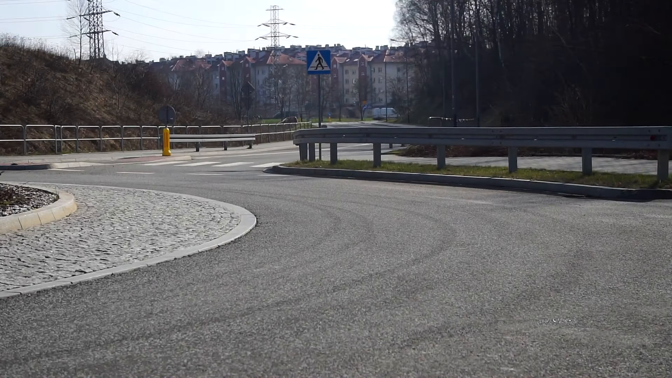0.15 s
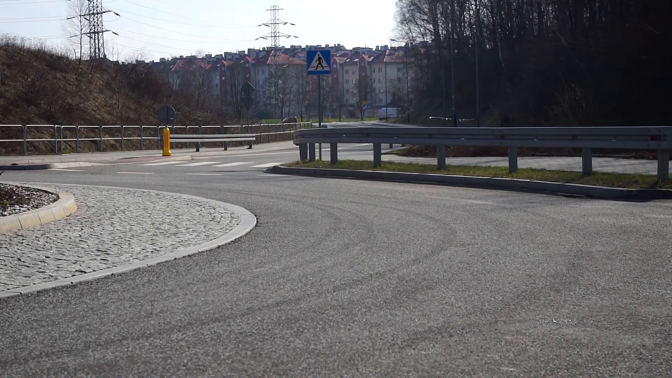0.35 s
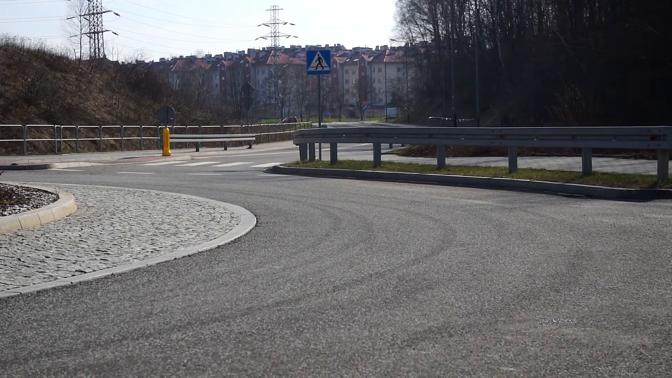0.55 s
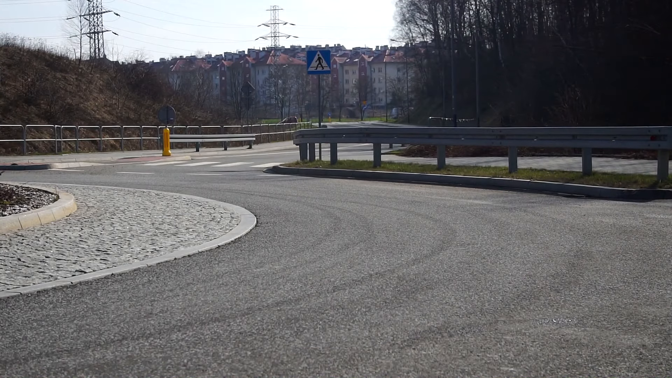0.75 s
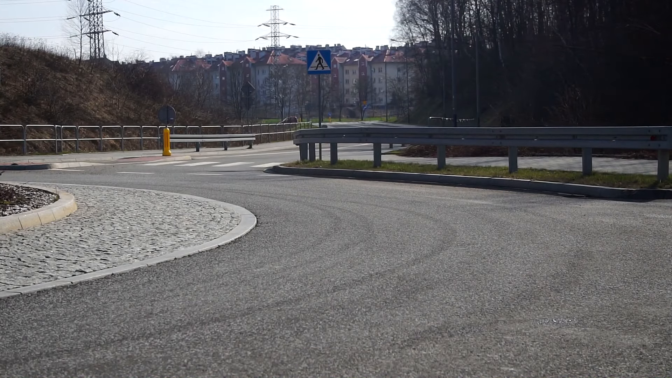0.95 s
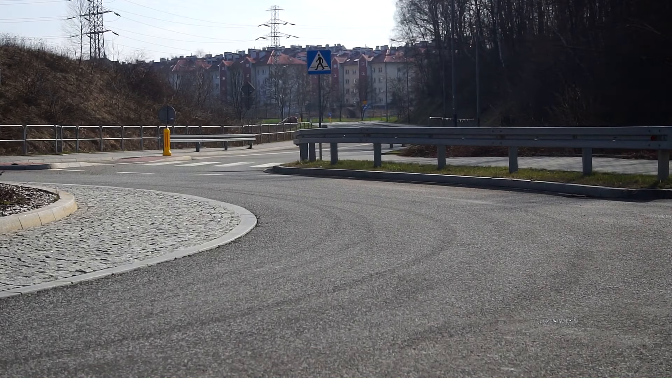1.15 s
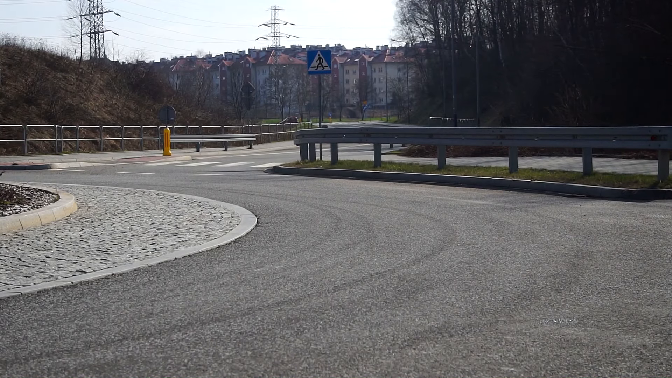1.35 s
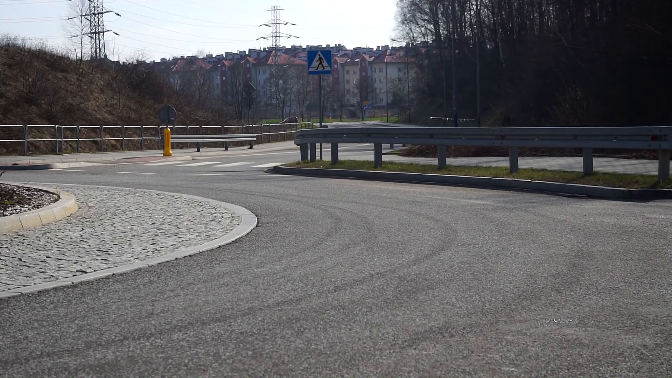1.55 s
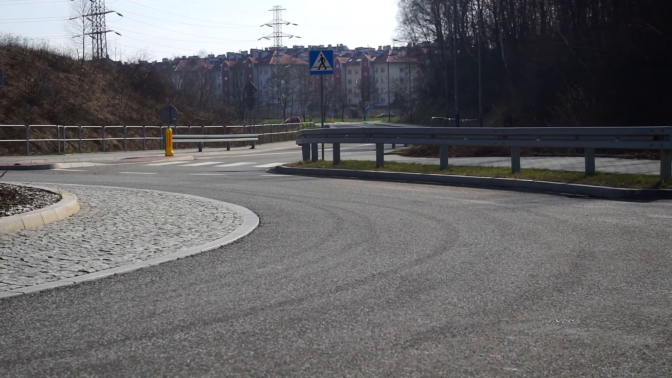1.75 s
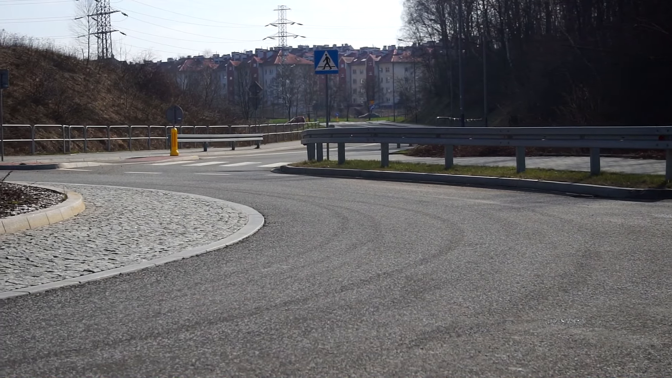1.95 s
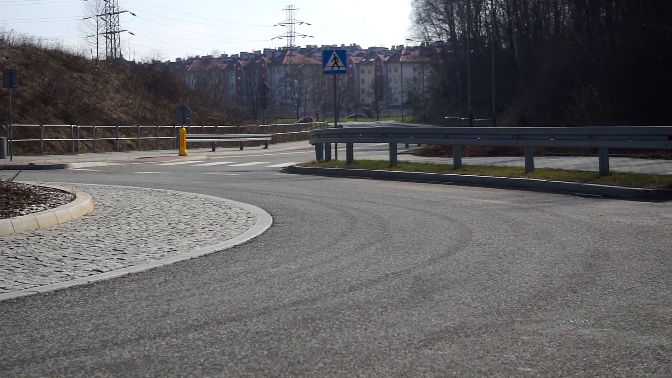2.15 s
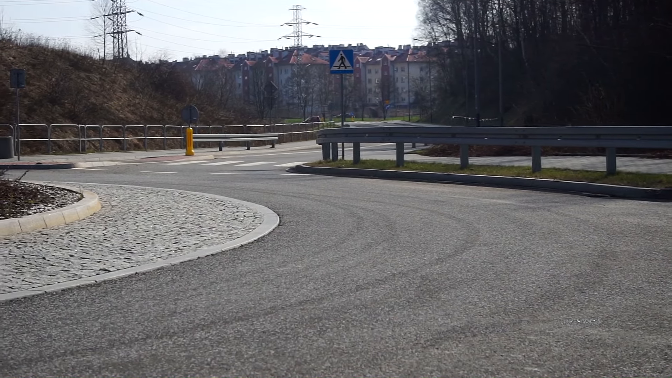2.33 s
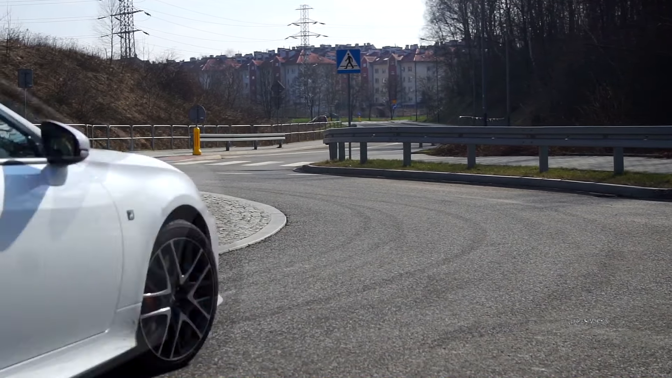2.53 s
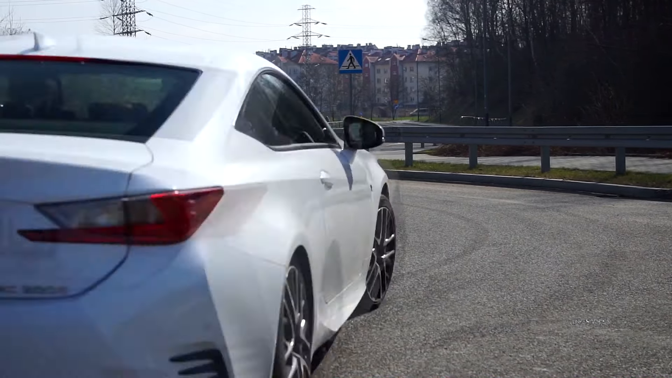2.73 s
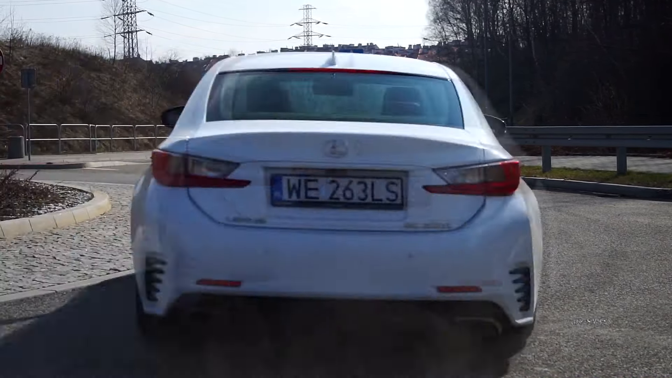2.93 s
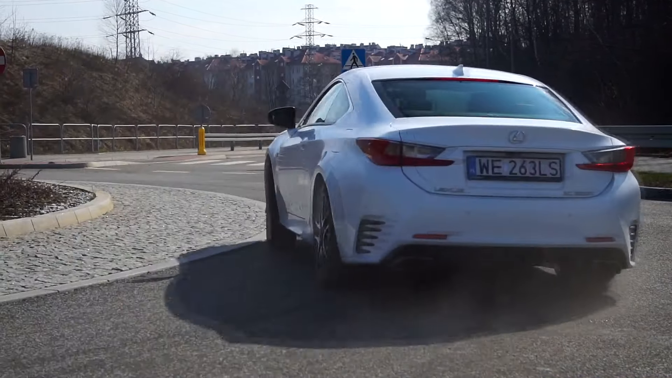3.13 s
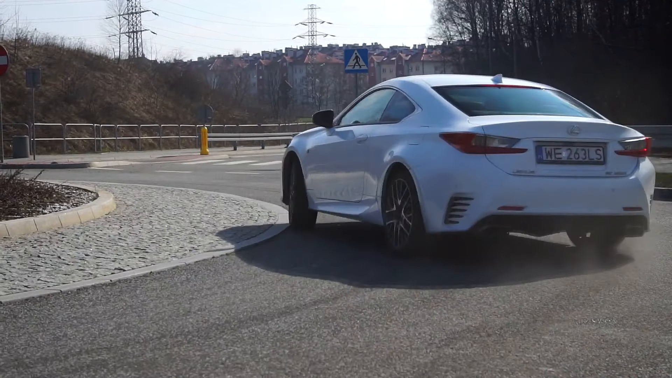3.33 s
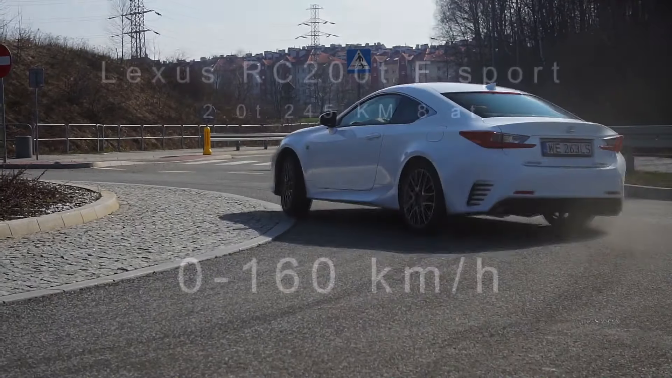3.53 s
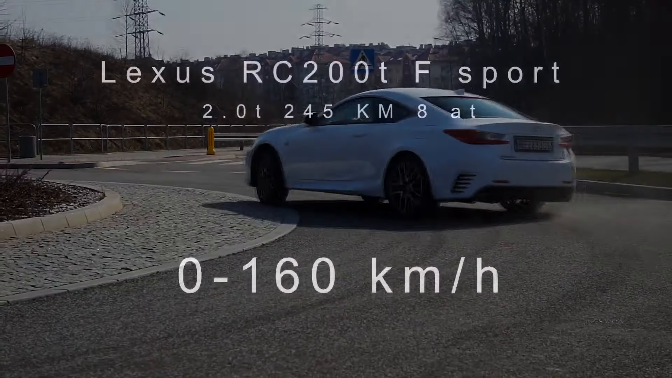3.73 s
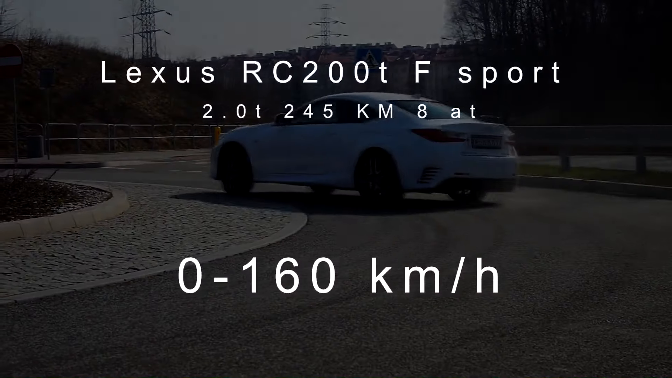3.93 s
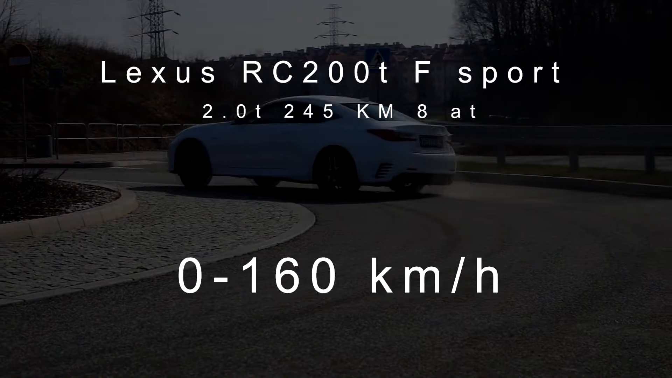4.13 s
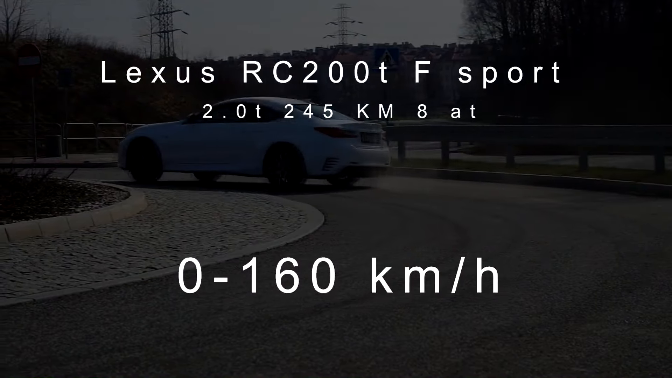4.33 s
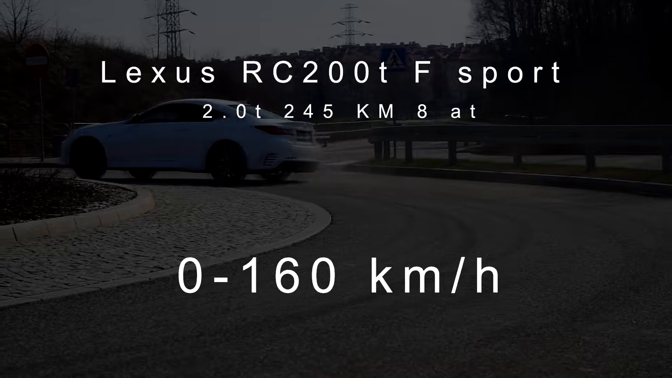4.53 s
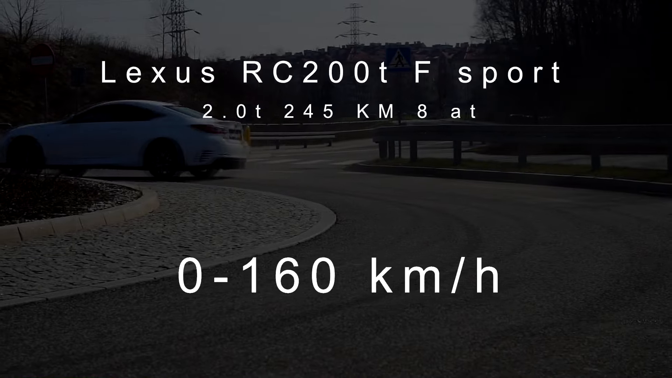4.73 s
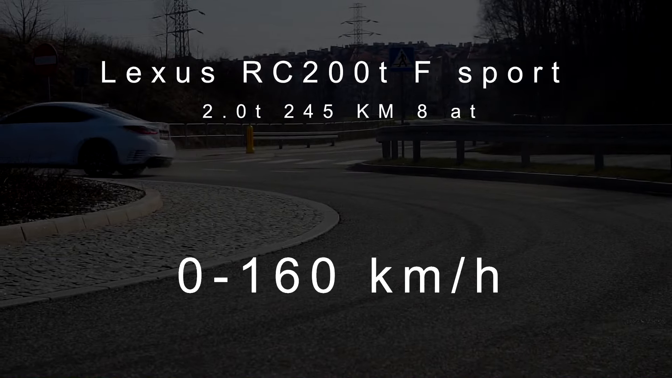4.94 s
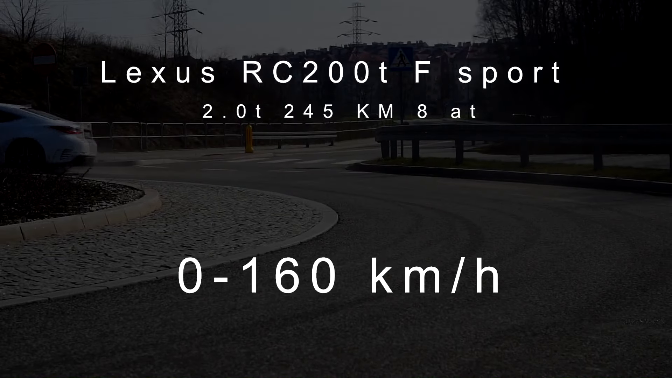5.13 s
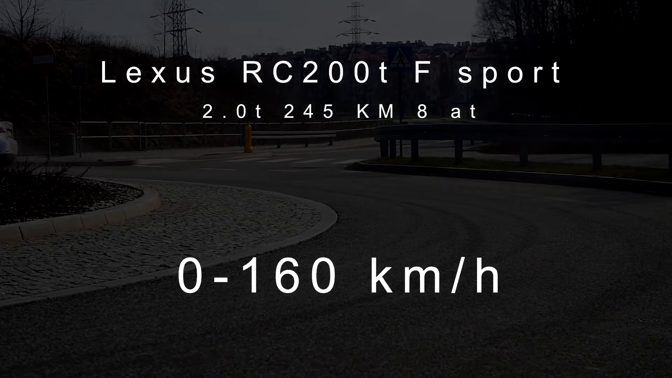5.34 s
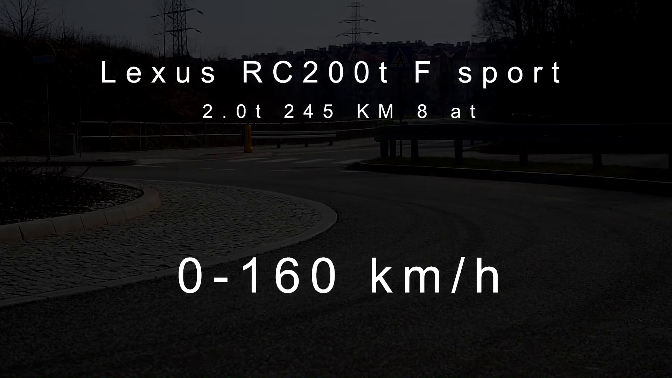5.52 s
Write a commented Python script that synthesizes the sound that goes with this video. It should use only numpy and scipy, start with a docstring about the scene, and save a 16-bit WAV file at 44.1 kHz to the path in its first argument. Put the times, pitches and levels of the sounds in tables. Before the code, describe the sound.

Continuous tyre squeal, two close rough notes beating together with brighter overtones, over gritty hiss and low rolling roar. It is loudest early during wheelspin, with brief yelps and engine growl on the left. A hissing swish marks the close pass, then the sound shifts to the centre, receding with reflections from a guard rail and bank. Wind thumps the microphone near the end.

```python
"""A car slides round a roundabout: its wheels spin and cry, then grip, beside the microphones on the left.
Two tyres stick and slip on the asphalt, each singing a fluttering note over the scrub of rubber and grit.
The engine drones and the tyres roar beneath; a guard rail and a bank throw the squeal back.
Midway the wheels pass closest with a swish and a spray of grit, and the car draws away ahead.
Late on a gust swells and buffets the microphones while the squeal dies away."""
import sys
import numpy as np
from scipy import signal
from scipy.fft import rfft, irfft
from scipy.io import wavfile

SR = 44100
rng = np.random.default_rng(int(sys.argv[2]) if len(sys.argv) > 2 else 0)


def generate_wav(sig):
    """Save sig (samples, or channels by samples) to the path in sys.argv[1] as 16-bit PCM at SR."""
    pcm = np.round(np.clip(np.atleast_2d(sig).T, -1, 1) * 32767).astype(np.int16)
    wavfile.write(sys.argv[1], SR, pcm)


N = 250297
TIME = np.arange(N) / SR  # s
FREQS = np.fft.rfftfreq(N, 1 / SR)  # Hz

# the car's bearing: start_s, beside (1 = beside the microphones on the left, 0 = straight ahead)
BEARING = [(0, 0.87), (2.3, 0.9), (2.55, 0.6), (2.75, 0.17), (3.1, 0.007)]
# how the slide goes: start_s, unsteadiness_factor of the stick-slip,
# echo_db (uneven, weakest near the pass and strongest at the end)
SLIDE_COURSE = [(0, 1.7, -6), (.5, 1.28, -9), (.9, 0.99, -4.5), (1.7, 1.5, -12.5), (2.1, 1.4, -8.5),
                (2.4, 0.94, -16), (2.9, 1.14, -6.5), (3.2, 0.96, -12), (3.4, 1.12, -4), (3.85, 0.73, -7.5),
                (4.2, 1.12, -6.5), (4.6, 1.24, -5.5), (5.2, 1.46, -3.5), (5.68, 1.26, 1)]
# rubber dragged over the asphalt: start_s, scrub_db, hiss_db
DRAG_LEVELS = [(0, -43, -53.5), (.2, -39.5, -52), (0.37, -36.5, -43), (0.52, -35.5, -45), (.63, -37.5, -49),
               (.74, -39, -46), (.82, -44.5, -50), (1.04, -41, -49), (1.11, -42.5, -43),
               (1.2, -39.5, -48.5), (1.28, -43.5, -51.5), (2.1, -44.5, -49.5), (2.65, -50.5, -53),
               (2.87, -48, -52), (3.0, -50.5, -57), (3.35, -40.5, -50.5), (3.7, -46.5, -53.5),
               (4.0, -48.5, -53), (4.2, -49.5, -64.5), (4.45, -53, -65), (4.6, -56, -76), (4.95, -58, -75),
               (5.2, -58.5, -87), (5.6, -76.5, -100)]


def amp(db):
    """Decibels to gain."""
    return 10 ** (np.asarray(db) / 20)


def unit(x):
    """Scales to rms 1."""
    return x / np.sqrt(np.mean(abs(x) ** 2) + 1e-20)


def curves(rows):
    """Each column of a table, joined by straight lines in time."""
    s, *columns = np.transpose(rows)
    return [np.interp(TIME, s, c) for c in columns]


def noise(spectrum):
    """Noise of rms 1 with the given spectrum, falling 20 dB per octave relative to each end beyond it."""
    hz, db = np.transpose(spectrum)
    octave, knots = np.log2(FREQS + 1), np.log2(hz)
    beyond = abs(octave - np.clip(octave, knots[0], knots[-1]))
    gain = amp(np.interp(octave, knots, db) - 20 * beyond)
    return unit(irfft(rfft(rng.standard_normal(N)) * gain, N))


def wander(rate_hz):
    """Smooth chance of rms 1, moving up to about the given rate."""
    u = FREQS / rate_hz
    gain = u / (u + .3) / np.sqrt(1 + u ** 10)
    return unit(irfft(rfft(rng.standard_normal(N)) * gain, N))


def pan(x, side_db):
    """Shares the power between left and right; side_db is left minus right."""
    gains = amp(np.array([side_db, -side_db]) / 2)
    return x * gains / np.sqrt(np.mean(gains ** 2, axis=0))


def wide(spectrum, alike):
    """A pair of noises, alike from 0 (unrelated) to 1 (the same)."""
    left, alike = noise(spectrum), np.clip(alike, -1, 1)
    right = alike * left + np.sqrt(1 - alike ** 2) * noise(spectrum)
    return np.array([left, right])


def place(pair):
    """The car's bearing sets the level and phase between the two microphones, frequency by frequency."""
    # the two microphones: pitch_hz, then with the car beside: left_minus_right_db, left_lag_radians,
    # then with the car ahead: left_minus_right_db, left_lag_radians
    microphones = [(200, 2, 1.2, 4, .1), (500, 14, 1.2, 0.5, .35), (780, 13.7, 0.76, 2.5, 0.69),
                   (1400, 24.5, 3, 0.5, 1.1), (1730, 14.4, 3.2, 0, 0.59), (2240, 7.9, 3, -0.5, 0.7),
                   (2670, 4.4, 2.5, 0.5, .5), (3200, 14.7, 3.5, 0, 0.57), (4200, 11.2, 4, 1, 0.69),
                   (5230, 1.7, 3, 4.5, .8), (6660, 4.6, 2.5, 2.5, 0.75), (8000, 8.1, 1.8, 4, 1.2),
                   (9300, 6, 1.75, 1.5, 0.82), (12000, 16, -0.5, 4, .8), (15000, 23, -10, 2, 2)]
    hz, s, z = signal.stft(pair, SR, nperseg=512, noverlap=384)
    beside = np.interp(s, *np.transpose(BEARING))
    knots, *columns = np.transpose(microphones)
    db_beside, lag_beside, db_ahead, lag_ahead = [np.interp(hz, knots, c)[:, None] for c in columns]
    lag = lag_ahead + beside * (lag_beside - lag_ahead)
    side_db = db_ahead + beside * (db_beside - db_ahead)
    z = pan(np.array([z[0] * np.exp(-1j * lag), z[1]]), side_db)
    return signal.istft(z, SR, nperseg=512, noverlap=384)[1][:, :N]


def wind():
    """A lumpy gust swells, peaks and dies at the microphones; eddies in it strike as sharper buffets."""
    # colour of the gust: pitch_hz, density_db (per Hz, relative)
    wind_spectrum = [(15, -16), (40, -2), (90, 0), (170, -3), (250, -8), (400, -21), (800, -33),
                     (1500, -53)]
    # eddies striking the microphones: start_s, peak_db
    buffets = [(4.459, -54), (4.56, -55), (4.87, -50), (4.931, -51), (5.07, -43), (5.12, -51),
               (5.185, -45.5), (5.269, -49)]
    start_s, peak_s, peak_db = 4.38, 5.06, -53.5
    rise_db_per_s, fall_db_per_s, buffet_rise_s = 10, 16, 0.013
    arrival = np.clip((TIME - start_s) / 0.09, 0, 1)
    late = TIME - peak_s
    gust_db = peak_db + np.minimum(rise_db_per_s * late, -fall_db_per_s * late)
    power = (arrival * amp(gust_db)) ** 2
    for buffet_s, db in buffets:
        age = np.maximum(TIME - buffet_s, 0) / buffet_rise_s
        power = power + (amp(db) * age * np.exp(1 - age)) ** 2
    lumps = unit(amp(1.5 * wander(30)))
    return np.sqrt(power) * lumps * wide(wind_spectrum, alike=0.95)


def road():
    """The low roar of rolling tyres, with their air cavity ringing near 210 Hz."""
    # colour of the rolling noise: pitch_hz, density_db (per Hz, relative)
    road_spectrum = [(25, -36), (55, -3.5), (90, 0.5), (130, -3.5), (175, -1), (212, 6.5), (260, -5),
                     (370, -1.5), (480, -2), (620, 2.5), (900, -22)]
    # rolling noise before a lift of 1 dB: start_s, level_db
    road_level = [(0, -49), (.35, -45), (.6, -50.5), (1.1, -60.5), (1.7, -62), (2.2, -62), (2.9, -57.5),
                  (3.5, -61.5), (4.1, -60.5), (4.6, -68.5), (5.2, -71.5), (5.68, -91)]
    level_db, = curves(road_level)
    beside, = curves(BEARING)
    return pan(amp(level_db + 1.0) * wide(road_spectrum, alike=0.9), 5.4 * beside)


def engine():
    """Shaft-locked orders of a four-cylinder engine; exhaust and intake add tones and noise with load."""
    # crankshaft speed: start_s, turns_per_s
    shaft = [(0, 44.8), (.2, 46), (.52, 51.8), (.75, 48), (.9, 48.3), (1.2, 50.7), (1.42, 51.7),
             (1.8, 43.5), (2.05, 40), (3.4, 44.7), (3.65, 46), (3.9, 48.5), (4.4, 46), (5.2, 40.3),
             (5.68, 40.4)]
    # engine levels: start_s, drone_db, boom_db (exhaust), light (share of the light-load timbre, 0-1)
    engine_course = [(0, -46, -50, 0.22), (.4, -46.5, -47, 0.01), (.55, -55, -60, 0.1),
                     (.8, -55, -62, 0.24), (1.1, -61, -71, 0.07), (1.45, -56.5, -76, 0.41),
                     (1.8, -67, -78, 0.22), (2.15, -66, -83, 0.3), (2.4, -81, -81, 0.6),
                     (3.2, -96, -96, 0.89), (4.2, -99, -91, 1), (5, -63.5, -84, 0.8),
                     (5.35, -63, -83, 0.99), (5.68, -66, -66, 0.98)]
    # engine orders: order (multiple of the shaft), load_db, light_db (at light load)
    orders = [(3, -14, -33), (4, 0.5, 2.5), (4.5, -15, -29.5), (5, -10.5, -21), (6, -14.5, -8.5),
              (7, -12.5, -25), (8, -16.5, -7), (9, -24.5, -23), (10, -7.5, -9.5), (11, -27, -28),
              (12, 3, -25), (13, -11, -31), (14, 3, -30), (16, -10, -16)]
    # colours of exhaust and intake noise: pitch_hz, density_db (per Hz, relative)
    rumble_spectrum = [(20, -17), (45, -1), (100, -24), (160, -8), (260, -23), (500, -17)]
    intake_spectrum = [(300, -13), (450, -10), (580, 8.5), (700, -7), (1000, -12.5)]
    speed, = curves(shaft)
    drone_db, boom_db, light = curves(engine_course)
    beside, = curves(BEARING)
    angle = 2 * np.pi * np.cumsum(speed * (1 + 0.0011 * wander(10))) / SR

    drone = np.zeros(N)
    for order, load_db, light_db in orders:
        order_db = load_db + light * (light_db - load_db) + .5 * wander(11)
        drone += amp(order_db) * np.sin(order * angle + 2 * np.pi * rng.random())
    # the four cylinders fire twice a turn
    firing = (amp(boom_db) + light ** 2 * amp(drone_db - 6.5)) * np.sin(2 * angle)
    boom = (amp(boom_db) * np.sin(angle) + firing) * amp(1.0 * wander(16))
    # the tailpipes point at the microphones for a moment, ringing on the fourth harmonic of the firing
    pipe_s, pipe_width_s, pipe_db = 3.6, 0.3, -67.5
    pipe = amp(pipe_db) / (1 + ((TIME - pipe_s) / pipe_width_s) ** 4) * np.sin(8 * angle)
    tones = np.sqrt(2) * (amp(drone_db) * drone + boom + pipe)

    rumble = amp(boom_db - 5.5) * wide(rumble_spectrum, alike=0.93)
    exhaust = pan(tones + rumble, 0.51 * beside)
    intake = place((1 - light) * amp(drone_db - 1.0) * wide(intake_spectrum, alike=0.47))
    return exhaust + intake


def swish():
    """A band of tread hiss that climbs as the front wheel sweeps by."""
    middle_s, half_s, level_db = 2.51, .25, -56
    middle_hz, climb_hz_per_s, width_hz = 5150, 1200, 850
    late = TIME - middle_s
    centre_hz = middle_hz + climb_hz_per_s * np.clip(late, -1, 1)
    band = wander(width_hz) + 1j * wander(width_hz)
    level = amp(level_db) / (1 + (late / half_s) ** 2)
    hiss = (band * np.exp(2j * np.pi * np.cumsum(centre_hz) / SR)).real
    beside, = curves(BEARING)
    return pan(level * hiss, 14 * beside)


def scrub():
    """Rubber dragged over stone chips: a coarse scrape, a hiss and a fine spray, and the wheel's swish."""
    # colours of the scrape, the hiss beside and ahead, and the spray: pitch_hz, density_db (per Hz, relative)
    scrape_spectrum = [(1500, -4.5), (2000, -9), (2700, 3.5), (3200, 2.5), (3600, -1), (4100, -1.5),
                       (4600, -14), (6000, -26.5)]
    hiss_beside = [(3500, 7.5), (4500, 7.5), (5500, 6.5), (7200, 3), (8300, 0), (10000, -5), (13000, -16),
                   (16000, -37)]
    hiss_ahead = [(3500, 8.5), (4500, -2), (5200, 2), (5800, 2.5), (6300, 3), (7200, 5), (8600, -8.5),
                  (10100, 0), (11500, -13.5), (12600, -15), (16000, -25)]
    spray_spectrum = [(6000, -24), (8500, -5), (10000, -4), (12500, -2), (14000, -5), (16000, -7)]
    scrub_db, hiss_db = curves(DRAG_LEVELS)
    # fast chatter, and slower swells with the road surface
    chatter = unit(amp(0.7 * wander(90) + 0.55 * wander(11)))
    grains = unit(amp(2.3 * wander(900)))
    scrape = amp(scrub_db) * wide(scrape_spectrum, alike=0.72) * unit(amp(0.69 * wander(310)))

    # the hiss changes colour as the car comes to face away
    ahead = np.clip((TIME - 2.85) / 0.5, 0, 1)
    hiss = np.sqrt(1 - ahead) * wide(hiss_beside, alike=0.69)
    hiss = hiss + np.sqrt(ahead) * wide(hiss_ahead, alike=0.71)

    pass_s, pass_half_s = 2.61, 0.16  # the wheels come closest
    near = 1 / np.hypot(1, (TIME - pass_s) / pass_half_s)
    spray_end_s, spray_stop_s = 4.06, 0.091
    spray_stopped = np.clip((TIME - spray_end_s) / spray_stop_s, 0, 1)
    # up at the closest point, 1 dB down before the car is ahead, then the spray stops abruptly
    spray_db = hiss_db - 11 + 13.5 * near - 1 * (1 - ahead) - 14 * spray_stopped
    spray = amp(spray_db) * wide(spray_spectrum, alike=0.23) * grains
    return chatter * (place(scrape + amp(hiss_db) * hiss + spray) + swish())


def wheelspin():
    """1 while the driven wheels spin freely, dying towards 0 as they grip."""
    spin_end_s, fade_s = 0.47, 0.51
    return np.exp(-np.maximum(TIME - spin_end_s, 0) / fade_s)


def horn(x, corner_hz):
    """The wedge between tread and road radiates poorly below its corner."""
    return signal.sosfilt(signal.butter(6, corner_hz, "high", fs=SR, output="sos"), x)


def stick_slip(hz, wobble, jitter):
    """A tread sticks and slips in cycles, shaken in pitch by the wheel and the grain of the road."""
    unsteady, _ = curves(SLIDE_COURSE)
    wheel_turns_per_s, bend_top_s = 6.2, 2.72  # the pitch bends once per turn, and tops out about here
    turn = 2 * np.pi * wheel_turns_per_s * (TIME - bend_top_s) + 0.32 * wander(2.95)
    bend = wobble * np.cos(turn)
    shake = unsteady * (.004 * wander(24) + jitter * wander(101.0))
    return np.exp(2j * np.pi * np.cumsum(hz * (1 + bend + shake)) / SR)


def fray(tone, fuzz, drift):
    """Tread blocks slip out of step: a tone drifts in phase (radians) and gains a fuzzy skirt."""
    unsteady, _ = curves(SLIDE_COURSE)
    depth = fuzz * unsteady
    flutter_hz, drift_hz = 114, 15.3
    skirt = unit(wander(flutter_hz) + 1j * wander(flutter_hz))
    drifted = tone * np.exp(1j * drift * wander(drift_hz))
    return np.sqrt(2) * (drifted * (1 + depth * skirt)).real / np.sqrt(1 + depth ** 2)


def blend(low, high, mix_db, lead_db, fuzz, drift):
    """One harmonic of two coupled tyres: tones from the lower one's multiple, by sums, to the higher's."""
    k = len(mix_db) - 1
    gains = np.array([amp(db + lead_db * j / k) for j, db in enumerate(mix_db)])
    gains = gains / np.linalg.norm(gains, axis=0)
    return sum(g * fray(low ** (k - j) * high ** j, fuzz, drift) for j, g in enumerate(gains))


def yelps():
    """Single tread ribs catch during the wheelspin and give a short cry above the squeal."""
    # cries of the tread: middle_s, length_s, pitch_hz, level_db
    cries = [(0.264, 0.059, 1140, -45), (.485, .08, 1140, -34), (.55, 0.1, 1263, -39)]
    cry = np.zeros(N)
    for middle_s, length_s, hz, db in cries:
        swell = amp(db) * np.exp(-(2 * (TIME - middle_s) / length_s) ** 2)
        cry += swell * fray(np.exp(2j * np.pi * hz * TIME), fuzz=0.29, drift=1.2)
    return cry


def tyres():
    """The treads sing two coupled stick-slip notes with overtones, and the inner wheel shrieks briefly."""
    # the lower tyre, nearly steady: start_s, pitch_hz
    low_tyre = [(0, 813), (.13, 800.6), (.35, 821), (.48, 830), (.65, 812), (.85, 797), (1.02, 788.5),
                (1.42, 801), (1.6, 779.3), (1.75, 774.3), (1.92, 756.5), (2.05, 768.5), (2.18, 789.5),
                (2.38, 793.6), (2.47, 780), (2.72, 789.2), (3.05, 786.3), (3.22, 746.5), (3.36, 767.5),
                (3.47, 755.6), (3.75, 765), (4.4, 770.4), (4.7, 764.8), (5.1, 770.4), (5.3, 788),
                (5.68, 812)]
    # the higher tyre, sharper when it spins: start_s, pitch_hz, lead_db (over the lower tyre)
    high_tyre = [(0, 892, -2), (.13, 890, -13), (.17, 895, -11), (.22, 895, 6), (.28, 886, 0),
                 (.34, 890, 1), (.39, 918, 13), (.45, 928, 27), (.51, 942, 8), (.56, 925, -4),
                 (.65, 885, -2), (.74, 884, 10), (.9, 875, 6.5), (1.02, 868, -13), (1.15, 876, 10),
                 (1.3, 872, -4), (1.6, 866, 0.5), (1.72, 855, -0.5), (1.82, 836, 4.5), (2.03, 855, -1),
                 (2.2, 855, -10.5), (2.47, 825, -9.5), (2.6, 845, -24), (2.7, 865, 1.5), (2.8, 842, -3.5),
                 (2.9, 860, 7.5), (2.98, 850, 2.5), (3.06, 818, 6), (3.14, 812, 10), (3.19, 788, 14),
                 (3.3, 784, 7), (3.36, 810, 5), (3.52, 809, 12), (3.62, 801, 12), (3.85, 823, 20),
                 (4.05, 826, 5.5), (4.15, 808, 18), (4.33, 802, 8), (4.45, 842, 1.5), (4.76, 850, 3.5),
                 (4.92, 868, -1), (5.12, 885, 2), (5.3, 860, -3.5), (5.68, 840, 0)]
    # the unloaded inner wheel as it spins up: start_s, pitch_hz, level_db
    inner_tyre = [(.12, 910, -70), (.24, 914.6, -36), (.36, 907, -35), (.45, 955, -39), (.53, 980, -45),
                  (.62, 970, -43), (.8, 940, -90)]
    # both tyres together, before tear and surge: start_s, fundamental_db, octave_db, third_db
    harmonic_levels = [(0, -31.5, -30, -54), (.2, -26.5, -31.5, -41), (0.41, -21, -25, -28),
                       (.5, -25, -27, -39), (0.6, -30, -25, -36), (1.05, -31, -28.5, -41),
                       (1.35, -29, -34, -48), (1.8, -31.5, -30.5, -44), (2, -29.5, -34.5, -46),
                       (2.13, -28, -35, -39), (2.25, -28, -45.5, -43.5), (2.45, -27.5, -44.5, -36),
                       (2.58, -27, -41.5, -42), (2.69, -30, -36, -38.5), (2.82, -29.5, -38, -42),
                       (2.92, -29.5, -35, -45), (3.05, -31.5, -36.5, -43), (3.2, -25, -36, -41.5),
                       (3.4, -31, -32.5, -37.5), (3.55, -25.5, -34, -43), (3.88, -24, -37.5, -46),
                       (4.25, -29, -37.5, -44.5), (4.45, -32.5, -39.5, -48.5), (4.6, -36, -40, -52),
                       (4.88, -38, -47.5, -55.5), (5.0, -42, -44.5, -58), (5.15, -43.5, -50.5, -58),
                       (5.4, -47.5, -50, -62), (5.68, -56, -56.5, -69)]
    # which tyre carries the overtones: start_s, lead_db (of the higher)
    overtone_lead = [(0, -15), (.45, -7), (.62, -17), (.76, -3), (.9, -11), (1.05, -13), (1.2, 6),
                     (1.35, -7), (1.7, 1.5), (1.9, -9), (2.1, -19), (2.27, -4), (2.5, -8), (2.75, -5.5),
                     (3, -7), (3.22, 6), (3.5, 4), (4.3, 0.5), (4.5, -6.5), (5, -18.5), (5.68, 6)]
    # tones of each overtone, from the lower tyre's multiple to the higher's: level_db
    octave_mix = [1, -4, 1]
    third_mix = [-0.5, -7, -7, -4.5]

    high_hz, lead_db = curves(high_tyre)
    lead_db = lead_db + 2.5 * wander(4.4)  # the load rocks between the tyres
    overtone_db, = curves(overtone_lead)
    inner_hz, inner_db = curves(inner_tyre)
    low = stick_slip(curves(low_tyre)[0], wobble=0.0098, jitter=0.015)
    high = stick_slip(high_hz, wobble=0.0053, jitter=0.021)
    inner = stick_slip(inner_hz, wobble=0.0055, jitter=0.017)

    levels = []
    for k, db in enumerate(curves(harmonic_levels)):
        tear_db = 5.5 * k * wheelspin()  # wheelspin tears each successive harmonic down
        surge_db = 0.68 * wander(3.7)  # the road surface changes
        levels.append(amp(db - tear_db + surge_db))
    first, octave, third = levels

    # beating throws off a tone above and one below the pair, strongest when both are equally loud
    above = fray(high ** 2 / low, fuzz=.4, drift=1.2)
    below = amp(1) * fray(low ** 2 / high, fuzz=.4, drift=1.2)
    side_tones = amp(-15.5 - 0.37 * abs(lead_db)) * (above + below)

    # as the spinning tyre bites, every other slip is weaker: a tone at 1.5 times its pitch
    bite_s, bite_half_s, bite_db = 0.67, 0.2, -41.5
    bite = amp(bite_db) / np.hypot(1, ((TIME - bite_s) / bite_half_s) ** 2)
    one_and_a_half = high * np.exp(.5j * np.unwrap(np.angle(high)))

    song = first * (blend(low, high, np.zeros(2), lead_db, fuzz=0.22, drift=0.48) + side_tones)
    song += octave * blend(low, high, octave_mix, overtone_db, fuzz=.27, drift=.7)
    # the third harmonic follows the overtone lead only in part
    song += third * blend(low, high, third_mix, 0.4 * overtone_db, fuzz=.6, drift=1.1)
    # the fourth harmonic
    song += third * amp(-15.5) * fray(low ** 3 * high, fuzz=.45, drift=1.1)
    song += bite * fray(one_and_a_half, fuzz=0.54, drift=1.8)
    song += amp(inner_db) * fray(inner, fuzz=0.52, drift=0.73)
    return song * unit(amp(0.77 * wander(180)))


def surroundings(x, t60):
    """Scattered echoes from rail and bank, one row each; their paths change as the car moves."""
    t = np.arange(SR // 2) / SR
    # axes: rail or bank, path, time; about 1500 echoes a second
    taps = rng.standard_normal((2, 2, len(t))) * (rng.random((2, 2, len(t))) < 1500 / SR)
    taps *= amp(-60 * t / t60) * (t > .004)
    taps /= np.linalg.norm(taps, axis=2, keepdims=True)
    travel = 2 * np.pi * np.cumsum(2 + wander(1.71)) / SR
    paths = x * np.array([np.cos(travel), np.sin(travel)])
    return signal.fftconvolve(paths[None], taps, axes=2).sum(axis=1)[:, :N]


def squeal():
    """The tyres and the rasp of tearing rubber; the rail echoes from the car's side, the bank from ahead."""
    # colour of the rasp: pitch_hz, density_db (per Hz, relative)
    rasp_spectrum = [(400, -35), (600, -20.5), (730, -4), (1000, 2.5), (1300, -4), (1900, -4), (2300, -6.5),
                     (3000, -35)]
    _, echo_db = curves(SLIDE_COURSE)
    scrub_db, _ = curves(DRAG_LEVELS)
    # the rasp follows the scrub, and is stronger during wheelspin
    rasp_db = scrub_db + 2 + 5.5 * wheelspin() + 1.0 * wander(43)
    rasp = amp(rasp_db) * noise(rasp_spectrum)
    direct = amp(0.34) * horn(tyres() + yelps(), corner_hz=752) + rasp
    rail, bank = surroundings(direct, t60=0.38)
    wet = amp(echo_db)
    heard = (direct + wet * rail) / np.sqrt(1 + wet ** 2)
    return place(np.array([heard, heard])) + amp(-18) * bank


def scene():
    """The gust, and the sliding car with its echoes."""
    return wind() + road() + engine() + scrub() + squeal()


def record(dry):
    """The recorder's upper band limit, a steep low-pass."""
    edge_hz = 15750
    low_pass = signal.firwin(511, edge_hz, window=("kaiser", 9), fs=SR)
    return signal.oaconvolve(dry, low_pass[None], "same")


dry = scene()
out = record(dry)
generate_wav(out)
```